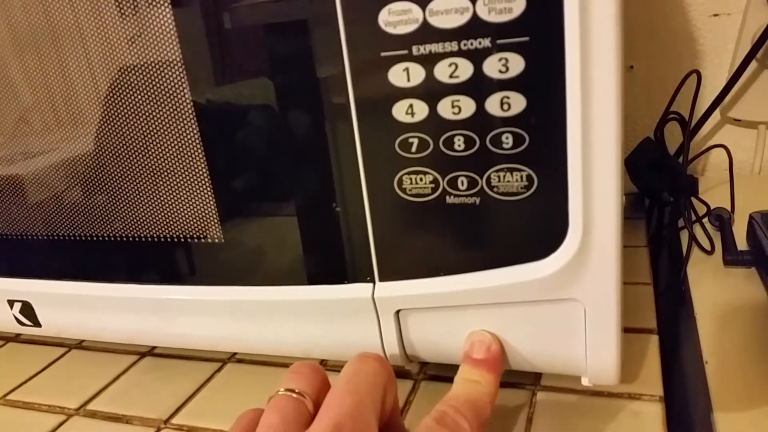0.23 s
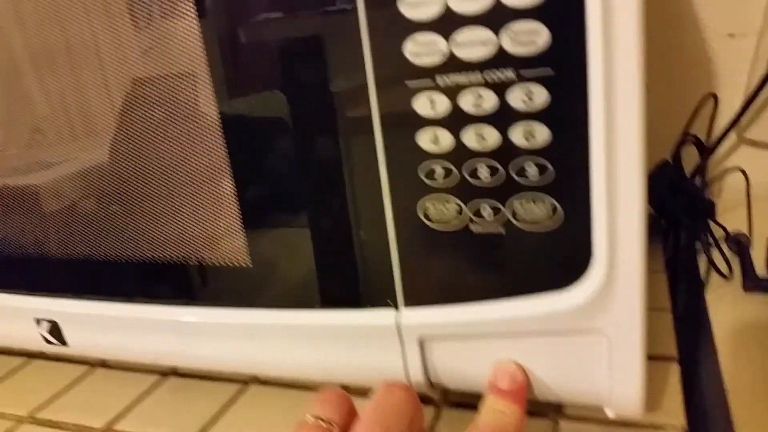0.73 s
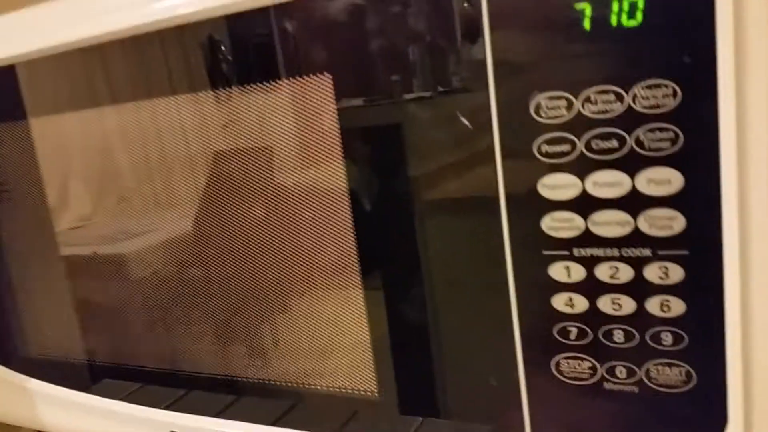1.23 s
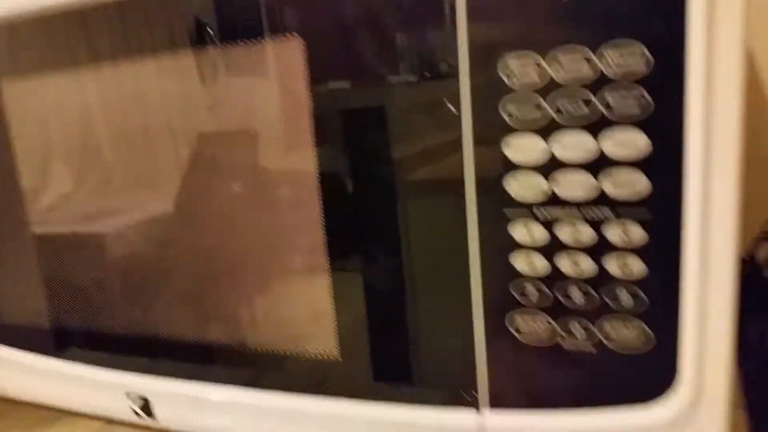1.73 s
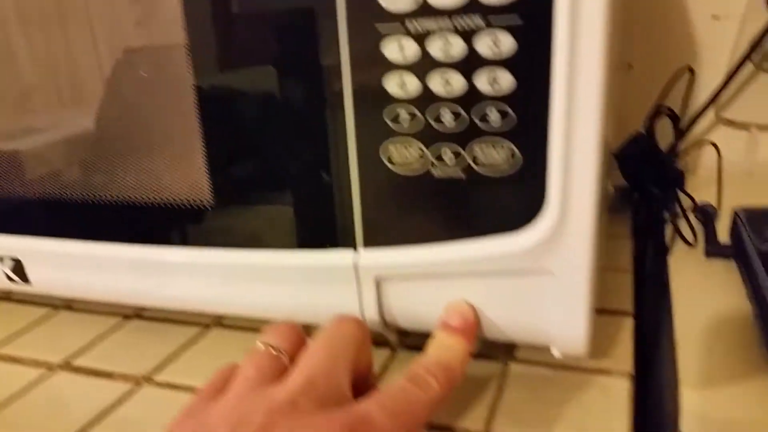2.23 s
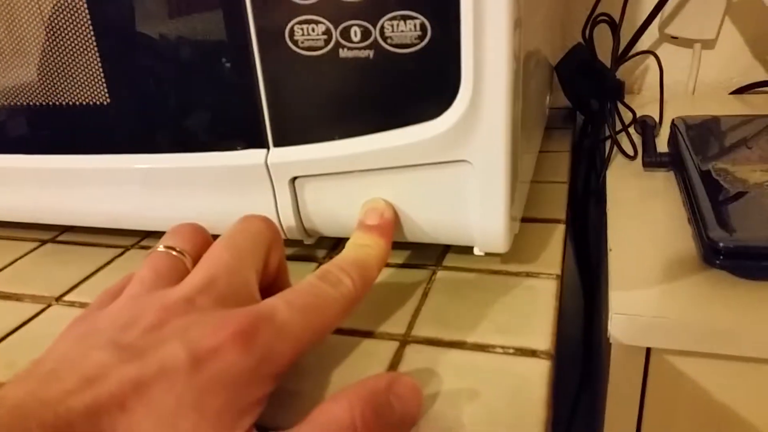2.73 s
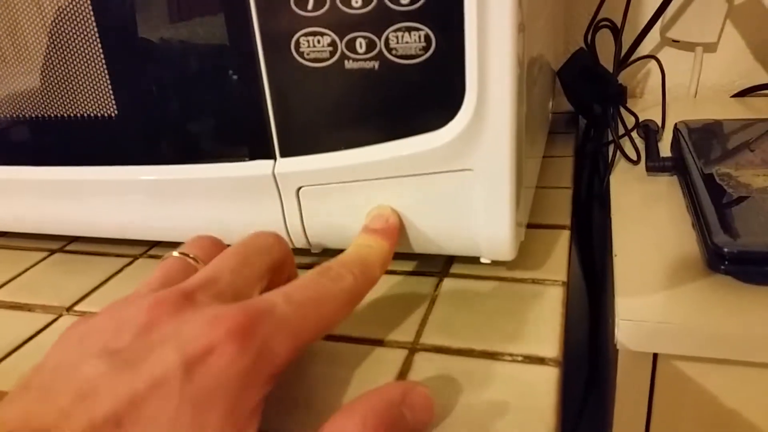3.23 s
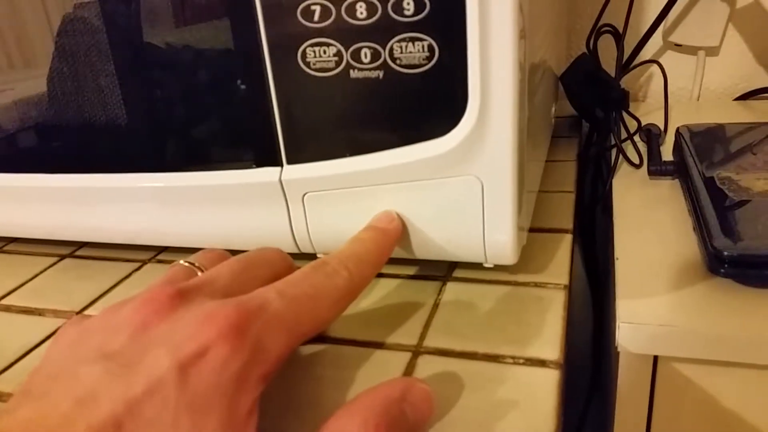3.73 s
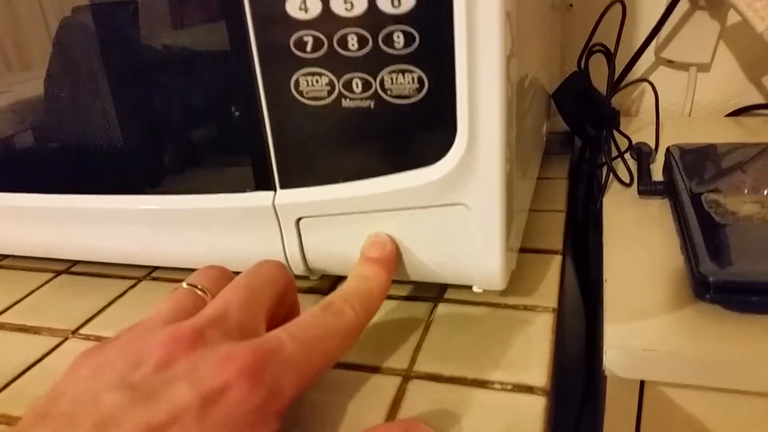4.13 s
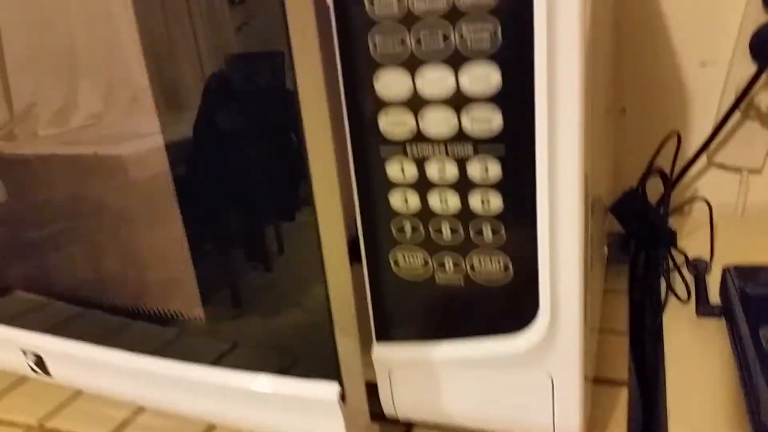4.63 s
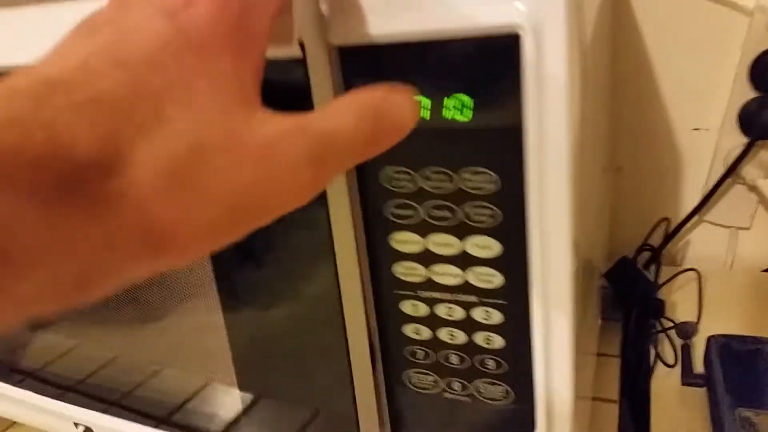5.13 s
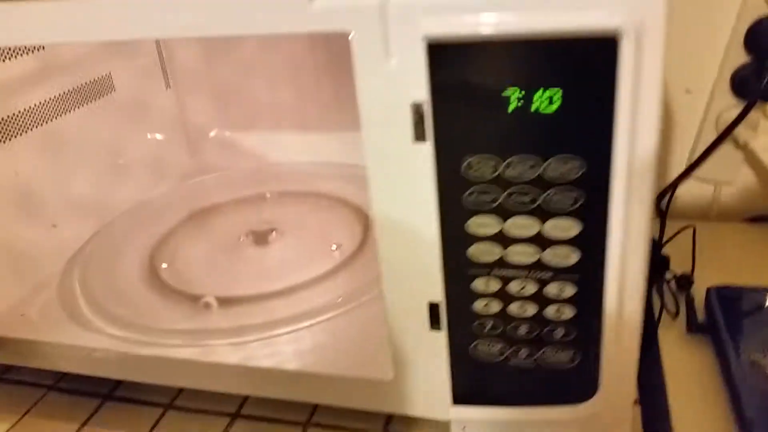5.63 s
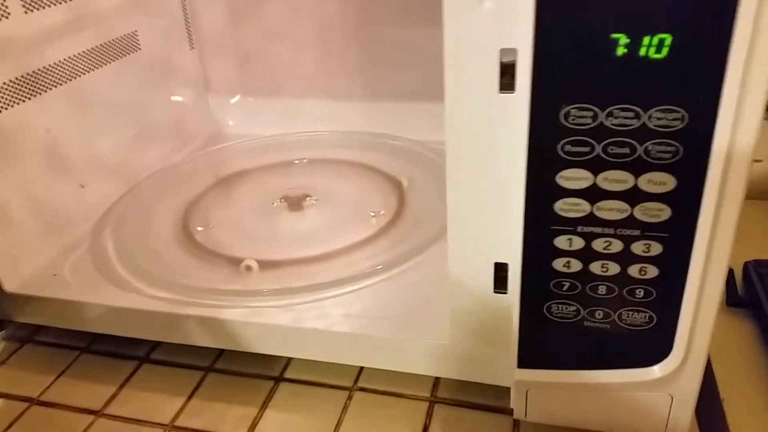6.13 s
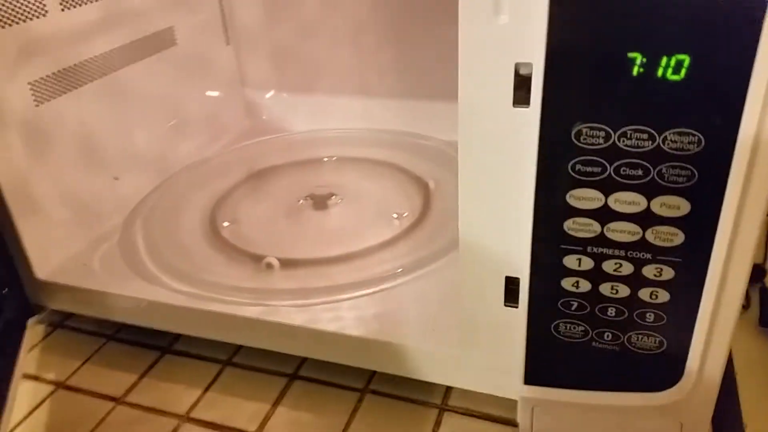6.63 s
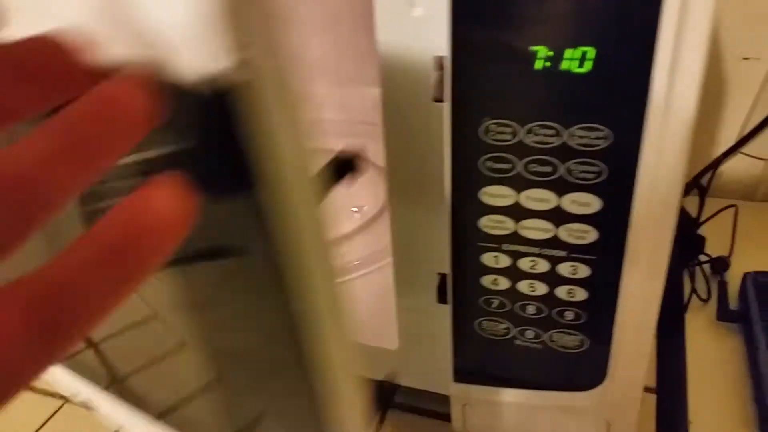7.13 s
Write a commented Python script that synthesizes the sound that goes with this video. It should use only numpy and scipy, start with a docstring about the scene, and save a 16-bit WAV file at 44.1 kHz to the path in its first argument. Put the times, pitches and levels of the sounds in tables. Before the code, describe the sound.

Close in a hard kitchen, a microwave whirs and hums, clicks off and coasts down; its door clunks open loudly, then knocks softly.

```python
"""A microwave oven on a tiled kitchen counter: filtered noise gives air and faint hiss, sines give hum and fan.
First the fan spins up with a soft bump of the hand, then runs steadily until the switch cuts the power.
As it coasts down the button is pushed home, the door judders and the latch lets go with a loud clatter.
Last the door knocks and ticks as it is swung by hand. Bursts of noise and ringing modes make the contacts;
a small hard room answers them."""
import sys
import numpy as np
from scipy import signal
from scipy.fft import rfft, irfft, next_fast_len
from scipy.io import wavfile
from scipy.ndimage import uniform_filter1d, map_coordinates

SR = 44100
rng = np.random.default_rng(int(sys.argv[2]) if len(sys.argv) > 2 else 0)


def output_pcm(signal):
    """Save a mono or channel-first signal as 16-bit PCM at the path in sys.argv[1].

    Samples are clipped to [-1, 1] before scaling.
    """
    pcm = np.clip(np.atleast_2d(signal).T, -1, 1) * 32767
    wavfile.write(sys.argv[1], SR, np.round(pcm).astype(np.int16))


N = 325017  # length in samples

# Background levels: (time [s], room rumble [dB], microphone hiss [dB])
BACKGROUND_LEVELS = [(0, -48.5, -62), (4.3, -54.5, -61.5), (4.85, -54.5, -66.5), (5.4, -52, -64),
                     (6.6, -57, -69), (7.4, -57, -66)]
# Colour of the room rumble: (frequency [Hz], relative level [dB])
RUMBLE_COLOUR = [(20, -6), (60, 0.5), (100, 3.5), (130, 1), (300, -2), (480, -9), (700, -14), (1100, -23.5),
                 (2200, -25), (3000, -43), (8000, -69.5)]
# Colour of the microphone hiss: (frequency [Hz], relative level [dB])
HISS_COLOUR = [(1000, -27.5), (2400, -5.5), (3100, -14.5), (3500, 2.5), (3900, 3), (4300, -7), (5000, -16),
               (6100, -33.5), (7400, -10), (9200, -35), (11000, -28.5), (12500, -9), (14500, -16.5)]
# Stereo width of broad sounds: (frequency [Hz], side against mid [dB])
WIDTH = [(30, -16), (80, -12.5), (160, -12.5), (300, -9), (600, -6.5), (1200, -0.5), (2500, 0.5),
         (5000, 0.5), (14000, -0.5)]
# Stereo width of the door, close by: (frequency [Hz], side against mid [dB])
CLOSE_WIDTH = [(30, -9), (80, -16.5), (160, -13.5), (300, -16), (600, -8.5), (1200, -1), (2300, -1),
               (4500, 1.5), (14000, -0.5)]
# Decay of the small hard room: (frequency [Hz], t60 [s])
KITCHEN_DECAY = [(100, 0.88), (300, 0.97), (700, 0.47), (2000, 0.4), (5000, 0.38), (14000, 0.58)]
# How strongly the room answers: (frequency [Hz], level [dB])
ROOM_SEND = [(200, -3.5), (2000, -6), (7000, -7), (13000, -15.5)]
# Balance of the two microphone ports: (frequency [Hz], left against right [dB])
PORT_BALANCE = [(200, -1), (400, -0.5), (700, 4), (1300, -2), (2300, 3.5), (3100, 1), (3900, 15),
                (5200, -6), (6300, -1.5), (7500, 5), (9200, 12), (11500, 1), (13000, 0)]
TOP_HZ = 14700  # band limit

# Partials of the mains hum: (multiple of the hum pitch, level [dB])
HUM_PARTIALS = [(1, 1), (2, -21.5), (3, -19.5), (4, -38.5), (5, -31)]
HUM_HZ = 99.9
OFF_S = 3.365  # the door switch cuts the power
HUM_DB, IDLE_DB, HUM_T60_S = -44.5, -67.5, 0.51  # under power, lasting trace, dying away

# Rough overtones of the fan: (multiple of the blade rate, level against the octave [dB])
FAN_OVERTONES = [(3, -19), (4, -23.5), (5, -20.5), (5.45, -22.5), (8, -26), (10, -28)]
# Dull rush of air through the vents: (frequency [Hz], relative level [dB])
RUSH_COLOUR = [(30, -24.5), (70, -18.5), (150, 7.5), (200, 2.5), (250, -6), (300, 4.5), (390, -2.5),
               (480, -1.5), (590, -7.5), (700, -2.5), (860, -4), (1000, -13.5), (1500, -34), (4000, -86.5)]
# Bright rush of air through the vents: (frequency [Hz], relative level [dB])
BRIGHT_COLOUR = [(400, -46.5), (850, -19), (1050, 2), (1250, 0.5), (1450, 1), (1700, 0), (1850, -4.5),
                 (2300, -6), (2900, -13.5), (4500, -28.5), (9000, -72)]
# Panels that boom as a blade tone glides past: (frequency [Hz], half-width [Hz], lift [dB])
PANELS = [(147.5, 6.8, 12), (155.7, 2.7, 10.5), (165.6, 1.2, 5), (294.4, 23, 10.5)]
FULL_HZ = 168.1  # blade-pass rate at full speed
START_HZ, CLIMB_HZ_PER_S, KNEE = 20, 118, 10  # first rate, steady climb, sharpness of levelling off
COAST_S, COAST_POWER = 0.49, 0.76  # air drag slows the fan, fast at first
BLADE_DB, BLADE_POWER = -40, 3.6  # blade tone at full speed before panel lift, power of speed it follows
OCTAVE_DB, OCTAVE_POWER = -38, 15  # the same for its octave

# Modes of the steel case and its cavity: (frequency [Hz], relative level [dB], t60 [s])
CASE_MODES = [(98, -15, .6), (139, -16, .45), (157, -12, .75), (169, -13.5, .45), (184, -16, .45),
              (207, -21, .4), (254, -26, .95), (286, -22, .6), (506, -17, .36), (542, -14.5, .28),
              (579.5, -17, .28), (633, -18, .3), (698, -22, .2), (786, -24, .3), (830, -17, .28),
              (914.5, -17.5, .28), (956, -18.5, .33), (1016, -18.5, .3), (1055, -18.5, .28),
              (1122, -17.5, .36), (1221, -18, .24), (1297, -21, .22), (1380, -18, .24), (1444, -17.5, .24),
              (1571, -17.5, .22), (1643, -20, .25), (1911, -27, .22), (2045, -17.5, .22), (2132, -18, .22),
              (2296, -19, .26), (2600, -26.5, .25), (3580, -33, .28), (4260, -26, .14)]
CAVITY_FROM_HZ, CAVITY_WIDTH_HZ = 450, 9  # above this the air inside shares case modes; half-width
# Dense, short-lived modes of the plastic front: (frequency [Hz], relative level per Hz [dB])
PLASTIC_COLOUR = [(25, -39.5), (70, -33.5), (150, -24.5), (210, -27), (370, -34), (550, -32), (900, -33.5),
                  (1400, -30.5), (2200, -32.5), (3000, -40), (4100, -40), (5500, -49), (8000, -39),
                  (10000, -47.5), (14000, -40)]
RATTLE_PER_S, RATTLE_DB, TAP_T60_S = 420, 3, .007  # loose plastic: tap rate, unevenness, tap decay
BRIGHT_FROM_HZ = 640  # brightness tilts a contact's drive upward from here

# Brief rubs and hisses, and one short click:
# (time [s], half-length [s], level [dB], centre [Hz], width [octaves])
SCUFFS = [(0.105, 0.18, -61.5, 1450, 0.42), (0.244, 0.019, -55, 1760, 0.22),
          (2.224, 0.045, -57.5, 14000, 0.1), (4.659, 0.033, -56, 13600, 0.092),
          (5.014, 0.00084, -44.5, 3360, 0.23), (5.152, 0.0064, -55.5, 1700, 0.34),
          (5.192, 0.015, -54.5, 1340, 0.33), (6.29, 0.0098, -67, 1697, 0.38),
          (5.562, 0.038, -53.5, 2550, 0.39), (6.017, 0.042, -52.5, 477, 0.47),
          (6.918, 0.04, -65, 730, 0.49)]
# Parts set swinging, from oven on its feet to door panel:
# (time [s], frequency [Hz], level [dB], build-up [s], t60 [s])
THUDS = [(.352, 102.5, -19.5, 0.036, 0.25), (0.359, 202, -34.5, .015, 0.26), (.35, 493, -35, .02, .1),
         (3.948, 162.5, -36, .006, .35), (4.394, 71, -12, 0.013, 0.12), (4.44, 101, -13.5, .01, 0.21),
         (4.452, 47, -33, .02, 0.63), (4.481, 32.8, -34, .03, 0.83), (4.534, 99.7, -20, 0.0076, 0.25),
         (5.131, 89, -31.5, 0.014, 0.25), (5.439, 280, -40, 0.0073, 0.071), (5.533, 294, -32, 0.0034, 0.08),
         (5.982, 163, -43, 0.0063, .29), (6.55, 257, -30.5, 0.0067, 0.084)]

# Drive of a soft bump: (frequency [Hz], level [dB])
BUMP_DRIVE = [(140, 2.5), (520, -8), (2000, -29), (7500, -54.5)]
# Bumps of the hand on the case: (time [s], level [dB], brightness [dB per octave])
BUMPS = [(.327, -42.5, -5), (.357, -33, -10.5), (3.27, -30, -6), (5.1, -38, -4), (5.135, -38, -1),
         (5.98, -39.5, -1), (6.05, -42, 6), (6.552, -46, -11), (6.805, -44, 0)]
BUMP_CONTACT_S, BUMP_REBOUND_S, BUMP_REBOUND_DB = 0.048, .022, -7
# Drive of a heavy jolt: (frequency [Hz], level [dB])
JOLT_DRIVE = [(100, -4), (175, 2.5), (280, -1.5), (450, -5), (850, 1), (2000, -13), (7500, -16.5),
              (13000, -18)]
# Door jolts as the button forces its hooks up and it springs free:
# (time [s], level [dB], brightness [dB per octave])
JOLTS = [(4.284, -30, 0), (4.331, -23.5, 1.5), (4.347, -20, 1), (4.378, -18, -1.5), (4.389, -23, 2),
         (4.402, -21.5, 1.5), (4.416, -24.5, 1), (4.439, -17.5, 0), (4.529, -25, -2), (4.565, -33.5, -5)]
JOLT_CONTACT_S, JOLT_REBOUND_S, JOLT_REBOUND_DB = 0.023, .007, -1
# Drive of a hollow knock: (frequency [Hz], level [dB])
KNOCK_DRIVE = [(140, -6), (330, -3), (540, 3.5), (1100, -2), (2000, -5), (7500, -22.5), (13000, -26.5)]
# Knocks of plastic button and door: (time [s], level [dB], brightness [dB per octave], contact [s])
KNOCKS = [(3.96, -37, -2, 0.02), (3.967, -39, -8, 0.013), (3.994, -32.5, -8, .016),
          (4.014, -46.5, -3.5, .016), (4.112, -36, -4.5, 0.013), (4.12, -41, -5.5, 0.0132),
          (4.208, -51, -4, 0.026), (4.244, -42.5, -4, .018), (4.265, -37, -2, .052),
          (4.3135, -16.5, -3, 0.0087), (4.459, -22.5, -1, 0.014), (5.0, -50, 1, .043),
          (5.404, -45.5, 0.5, .08), (5.438, -39.5, -1.5, .014), (5.446, -42.5, -2.5, 0.017),
          (5.454, -49.5, 3, 0.015), (5.531, -40, 2.5, .06), (5.625, -41.5, -0.5, 0.012),
          (5.958, -37.5, -6, 0.077), (6.549, -49.5, -14, 0.024), (6.568, -57, -9, 0.029)]
# Drive of a hard clack: (frequency [Hz], level [dB])
CLACK_DRIVE = [(140, -12), (520, -9), (1000, -1), (1500, -0.5), (2300, -0.5), (4000, -5), (7500, -14),
               (13000, -10)]
# Clacks of switch lever and latch hooks:
# (time [s], level [dB], brightness [dB per octave], contact [s])
CLACKS = [(3.323, -25.5, -3.5, .026), (3.331, -32.5, -3, 0.021), (3.338, -21, -6.5, 0.024),
          (3.346, -29.5, -7.5, .022), (3.356, -26.5, -3.5, 0.02), (3.365, -26, -5.5, 0.025),
          (4.3135, -28.5, 4, .016), (4.322, -30, -3.5, 0.012), (4.443, -24.5, -7.5, .018),
          (4.457, -11.5, -4, .011), (4.487, -15.5, 1, 0.031), (4.4955, -13, -1.5, .019),
          (4.513, -24, -1.5, .02)]
# Drive of a bright tick: (frequency [Hz], level [dB])
TICK_DRIVE = [(140, -5.5), (520, 4), (2000, -5.5), (6000, -11.5), (10500, -10.5), (13000, 2)]
# Ticks of the button and its spring: (time [s], level [dB], brightness [dB per octave], contact [s])
TICKS = [(3.27, -44, 0.5, .03), (3.291, -36, 0, .026), (3.325, -40, -1, .02), (3.337, -38, -1, .025),
         (3.355, -26.5, -0.1, .02), (3.365, -28.5, -1.1, .015), (4.208, -50.5, 0, .02),
         (4.272, -45, 1, .05), (4.286, -31, 0.5, .033), (4.302, -32.5, 2.5, .05), (4.3135, -33.5, 1, .012),
         (4.457, -27, 0, .007), (4.4875, -34.5, 3.5, .016)]
# Drive of the hinge: (frequency [Hz], level [dB])
HINGE_DRIVE = [(140, -7.5), (520, 1.5), (1500, -7), (2200, -3), (6000, -3.5), (7800, -0.5), (10500, -3),
               (12200, 1.5), (14500, -3.5)]
# Dry ticks as the door swings: (time [s], level [dB], brightness [dB per octave], contact [s])
HINGE_TICKS = [(4.963, -57, -1.5, 0.0067), (5.625, -49.5, -0.5, 0.023), (5.957, -50, -2, 0.033),
               (5.999, -50.5, 0, 0.044), (6.832, -46, 0, 0.078)]
# Button and latch lean left near 11 kHz and right above 12 kHz: (frequency [Hz], left against right [dB])
LATCH_BALANCE = [(9000, -0.5), (11000, 4.5), (12500, -7.5)]
# Latch hooks and their spring: (frequency [Hz], level [dB], t60 [s])
HOOK_MODES = [(2045, -1, .17), (2128, -2.5, .15), (2290, -3, .15), (2345, -6, .11), (2482, -10, .14),
              (2960, -10, .13), (3120, -12, .1), (4080, -9, .08), (4135, -9, .08), (5080, -18, .1)]
# Hooks snapping free: (time [s], level [dB])
HOOK_HITS = [(4.3135, -37), (4.458, -43), (4.4885, -27.5)]
# Steel stop at the end of the door's swing: (frequency [Hz], level [dB], t60 [s])
STOP_MODES = [(1296, -11.5, 0.076), (1580, -14, .027), (1955, -9, 0.055), (2024, -1.5, 0.024),
              (2160, -21, 0.11), (2170, -12, .09), (2390, -21, 0.054)]
# Door meeting the stop: (time [s], level [dB])
STOP_HITS = [(5.6245, -31), (5.632, -45), (5.642, -40.5)]


def amp(db):
    """Decibels to gain."""
    return 10 ** (np.asarray(db) / 20)


def unit(x):
    """x at rms 1."""
    return x / np.sqrt(np.mean(x ** 2) + 1e-20)


def along(points, hz):
    """(frequency, value) points joined on a log axis."""
    f, v = np.transpose(points)
    return np.interp(np.log(hz + 1), np.log(f + 1), v)


def curves(rows):
    """One value per sample for each column after the time."""
    s, *cols = np.transpose(rows)
    return [np.interp(np.arange(N) / SR, s, c) for c in cols]


def wobble(rate):
    """A smooth random curve, rate knots a second."""
    knots = rng.standard_normal(int(N * rate / SR) + 4)
    return map_coordinates(knots, [np.arange(N) * rate / SR])


def filtered(x, response):
    """x times a response of frequency."""
    n = x.shape[-1]
    m = next_fast_len(n + SR // 4)
    return irfft(rfft(x, m) * response(np.fft.rfftfreq(m, 1 / SR)), m)[..., :n]


def causal(level_db, size=4096):
    """The most prompt (minimum-phase) impulse response that has the given dB spectrum."""
    cepstrum = irfft(level_db(np.fft.rfftfreq(size, 1 / SR)) * np.log(10) / 20)
    cepstrum[1:size // 2] *= 2
    cepstrum[size // 2 + 1:] = 0
    return irfft(np.exp(rfft(cepstrum)))


def spread(pair, width=WIDTH):
    """Two unrelated signals become left and right: alike in the bass, apart in the treble."""
    def mid_side_gains(hz):
        turn = np.arctan(amp(along(width, hz)))
        return np.array([np.cos(turn), np.sin(turn)])
    mid, side = filtered(pair, mid_side_gains)
    return np.array([mid + side, mid - side])


def panned(x, balance):
    """x leaning left or right by frequency, at the same power."""
    def response(hz):
        gains = amp(np.outer([.5, -.5], along(balance, hz)))
        return gains / np.sqrt(np.mean(gains ** 2, axis=0))
    return filtered(x, response)


def noise(spectrum):
    """Stereo noise of rms 1 with the given colour."""
    white = spread(rng.standard_normal((2, N)))
    return unit(filtered(white, lambda hz: amp(along(spectrum, hz))))


def tone(pitch_hz, multiple, flutter_db):
    """One partial, of rms 1 before its level flutters."""
    phase = 2 * np.pi * (multiple * np.cumsum(pitch_hz) / SR + rng.random())
    return np.sqrt(2) * np.sin(phase) * amp(flutter_db * wobble(17))


def rough_tone(pitch_hz, multiple, rough_hz):
    """A partial of rms 1 whose strength and phase are stirred by turbulence."""
    stir = 1.1 + wobble(rough_hz) + 1j * wobble(rough_hz)
    turning = np.exp(2j * np.pi * multiple * np.cumsum(pitch_hz) / SR)
    return unit(np.real(stir * turning))


def background():
    """Room rumble and microphone hiss: coloured noise at slowly drawn levels."""
    rumble_db, hiss_db = curves(BACKGROUND_LEVELS)
    rumble = amp(rumble_db + 2.4 * wobble(8.7)) * noise(RUMBLE_COLOUR)
    return rumble + amp(hiss_db) * noise(HISS_COLOUR)


def kitchen(x):
    """Tiles and walls answer with decaying noise; each frequency dies at its own speed."""
    hz, t, z = signal.stft(rng.standard_normal((2, SR * 3 // 4)), SR, nperseg=256)
    fading = z * amp(-60 * t / along(KITCHEN_DECAY, hz)[:, None])
    tail = spread(signal.istft(fading, SR, nperseg=256)[1])
    delay = round(.006 * SR)  # 6 ms before the first answer
    tail = np.pad(tail / np.linalg.norm(tail[0]), ((0, 0), (delay, 0)))
    return signal.fftconvolve(x, tail, axes=1)[:, :N]


def since_off():
    """Seconds since the power was cut; zero before that."""
    return np.maximum(np.arange(N) / SR - OFF_S, 0)


def hum():
    """Windings shake the case at twice the mains frequency; a trace stays once the power is cut."""
    level = amp(HUM_DB - 60 * since_off() / HUM_T60_S) + amp(IDLE_DB)
    pitch = HUM_HZ * (1 + .004 * wobble(7.5))
    return level * sum(amp(db) * tone(pitch, k, flutter_db=0.9) for k, db in HUM_PARTIALS)


def fan_speed():
    """Share of full speed: a steady climb that levels off, then a coast against the air."""
    climb = (START_HZ + CLIMB_HZ_PER_S * np.arange(N) / SR) / FULL_HZ
    driven = climb / (1 + climb ** KNEE) ** (1 / KNEE)
    return driven / (1 + since_off() / COAST_S) ** COAST_POWER


def panel_lift(tone_hz):
    """Gain of a blade tone as it glides through the panel resonances."""
    return amp(sum(db * np.exp(-((tone_hz - hz) / width) ** 2) for hz, width, db in PANELS))


def cavity(x, lift_db):
    """Air noise leaving the cavity is lifted at the case's resonances and dips between them."""
    def level_db(hz):
        peaks = sum(np.exp(-((hz - mode_hz) / CAVITY_WIDTH_HZ) ** 2)
                    for mode_hz, _, _ in CASE_MODES if mode_hz > CAVITY_FROM_HZ)
        return lift_db * (peaks - uniform_filter1d(peaks, size=75))
    return signal.fftconvolve(x, causal(level_db, size=16384)[None], axes=1)[:, :N]


def fan():
    """Blade tones and air rush grow as powers of the speed; panels boom as a tone glides past."""
    speed = fan_speed()
    pitch = FULL_HZ * speed * (1 + .002 * wobble(10))
    blade = panel_lift(FULL_HZ * speed) * tone(pitch, 1, flutter_db=2.15)
    octave = panel_lift(2.02 * FULL_HZ * speed) * tone(pitch, 2, flutter_db=1.0)
    overtones = sum(amp(db) * rough_tone(pitch, k, rough_hz=22.1) for k, db in FAN_OVERTONES)
    tones = amp(BLADE_DB) * speed ** BLADE_POWER * blade
    tones = tones + amp(OCTAVE_DB) * speed ** OCTAVE_POWER * (octave + overtones)
    throb = 1 + .1 * tone(pitch, 0.91, flutter_db=-4)  # the bright air pulses just below the blade rate
    rush = amp(-41 + 0.48 * wobble(7.9)) * speed ** 2.85 * noise(RUSH_COLOUR)
    bright = amp(-49.5 + 0.39 * wobble(0.77)) * speed ** 3.44 * throb * noise(BRIGHT_COLOUR)
    return tones + cavity(rush + bright, lift_db=5)


def scuffs():
    """Brief rubs and hisses, and one short click: each a swell of noise around one pitch."""
    out, t = np.zeros((2, N + SR)), np.arange(-SR // 3, SR // 3) / SR
    for s, half_s, db, centre_hz, octaves in SCUFFS:
        band = lambda hz: np.exp(-.25 * (np.log2((hz + 1) / centre_hz) / octaves) ** 2)
        grain = unit(filtered(spread(rng.standard_normal((2, len(t)))), band))
        swell = np.exp(-.5 * (t / half_s) ** 2)
        out[:, round(s * SR):][:, :len(t)] += amp(db) * swell * grain
    return out[:, len(t) // 2:][:, :N]  # each swell peaks at its listed time


def thuds():
    """Each part swings as a low sine that builds up and dies away."""
    out, t = np.zeros(N + SR), np.arange(SR) / SR
    for s, hz, db, build_s, t60 in THUDS:
        envelope = amp(db - 60 * t / t60) * (1 - np.exp(-t / build_s))
        out[round(s * SR):][:SR] += envelope * np.sin(2 * np.pi * hz * t)
    return out[:N]


def ringing(modes, hits):
    """A small hard part rings with the same modes at every hit, in slightly varied balance."""
    out, t = np.zeros(N + SR), np.arange(SR // 2) / SR
    hz, db, t60 = np.transpose(modes)
    rings = np.sin(2 * np.pi * hz[:, None] * t) * amp(-60 * t / t60[:, None])
    for s, strength_db in hits:
        out[round(s * SR):][:len(t)] += amp(strength_db + db + rng.normal(0, 0.76, len(hz))) @ rings
    return out[:N]


def case_ring(drive_db, ring_db, t):
    """The steel case rings in decaying sines; its loose panels sit a little differently each time."""
    hz, db, t60 = np.transpose(CASE_MODES)
    sizes = amp(db + ring_db + drive_db(hz) + rng.normal(0, 3.2, len(hz)))
    sizes = sizes * rng.choice([-1, 1], len(hz))
    hz = hz * (1 + rng.normal(0, .002, len(hz)))
    turns = np.outer(hz, t).astype(np.float32)
    fall = np.outer(np.log(1000) / t60, t).astype(np.float32)
    return sizes @ (np.sin(2 * np.pi * turns) * np.exp(-fall))


def rattling(share, t):
    """Gain of loose plastic: the given share of its power comes in uneven little taps."""
    taps = (rng.random(len(t)) < RATTLE_PER_S / SR) * amp(RATTLE_DB * rng.standard_normal(len(t)))
    chatter = unit(signal.lfilter([1], [1, -amp(-60 / (TAP_T60_S * SR))], taps))
    return np.sqrt(1 - share + share * chatter ** 2)


def blow(drive_db, contact_s, body_t60, body_db, rattle, ring_db):
    """One contact: a spike, a crack and a short shudder of the plastic, and the ring of the steel case."""
    t = np.arange(SR * 3 // 4) / SR
    rise = 1 - np.exp(-t / (0.91 * contact_s ** 2))  # long contacts swell, short ones strike
    spike = amp(-0.5 - 60 * t / 0.00075)
    crack = np.sqrt(0.01 / contact_s) * (amp(-60 * t / contact_s) + spike)
    shudder = rattling(rattle, t) * amp(body_db - 60 * t / body_t60)
    grain = spread(rng.standard_normal((2, len(t))), CLOSE_WIDTH) * np.sqrt(SR / 2)
    burst = grain * rise * (crack + shudder)
    colour = causal(lambda hz: along(PLASTIC_COLOUR, hz) + drive_db(hz))
    plastic = signal.fftconvolve(burst, colour[None], axes=1)[:, :len(t)]
    return amp(6.0) * plastic + rise * case_ring(drive_db, ring_db, t)


def rebounding(rows, contact_s, rebound_s, rebound_db):
    """Each contact is followed by one weaker rebound."""
    return [(s + k * rebound_s, db + k * rebound_db, brightness, contact_s)
            for s, db, brightness in rows for k in (0, 1)]


def strike(contacts, drive, body_t60, body_db, rattle, ring_db):
    """All contacts of one kind; brightness tilts the treble of their shared drive."""
    out = np.zeros((2, N + SR))
    for s, db, brightness, contact_s in contacts:
        def drive_db(hz):
            tilt = brightness * np.log2(np.maximum(hz / BRIGHT_FROM_HZ, 1))
            return db + along(drive, hz) + tilt
        hit = blow(drive_db, contact_s, body_t60, body_db, rattle, ring_db)
        out[:, round(s * SR):][:, :hit.shape[1]] += hit
    return out[:, :N]


def door():
    """Hand, button, switch, hooks and door strike one case, each kind with its own drive and shudder."""
    bump_pairs = rebounding(BUMPS, BUMP_CONTACT_S, BUMP_REBOUND_S, BUMP_REBOUND_DB)
    jolt_pairs = rebounding(JOLTS, JOLT_CONTACT_S, JOLT_REBOUND_S, JOLT_REBOUND_DB)
    bumps = strike(bump_pairs, BUMP_DRIVE, body_t60=.16, body_db=-9.5, rattle=0.72, ring_db=-3.5)
    jolts = strike(jolt_pairs, JOLT_DRIVE, body_t60=0.11, body_db=-13.5, rattle=0.84, ring_db=-4.5)
    clacks = strike(CLACKS, CLACK_DRIVE, body_t60=0.14, body_db=-13, rattle=.9, ring_db=-7)
    ticks = strike(TICKS, TICK_DRIVE, body_t60=0.15, body_db=-18, rattle=0.5, ring_db=-3)
    knocks = strike(KNOCKS, KNOCK_DRIVE, body_t60=0.18, body_db=-18, rattle=0.42, ring_db=-3.5)
    hinge = strike(HINGE_TICKS, HINGE_DRIVE, body_t60=0.28, body_db=-7.5, rattle=.15, ring_db=-6)
    return panned(jolts + clacks + ticks, LATCH_BALANCE) + bumps + knocks + hinge


def scene():
    """The background, the running oven, and its door handled in the room."""
    handling = door() + ringing(HOOK_MODES, HOOK_HITS) + ringing(STOP_MODES, STOP_HITS) + scuffs()
    room = kitchen(filtered(handling, lambda hz: amp(along(ROOM_SEND, hz))))
    return background() + hum() + fan() + thuds() + handling + room


def record(dry):
    """The two ports differ by frequency; the loudest peaks are rounded off; the top band is cut."""
    x = panned(dry, PORT_BALANCE)
    x = x / (1 + (x / .55) ** 4) ** .25  # soft ceiling at 0.55
    return filtered(x, lambda hz: hz < TOP_HZ)


dry = scene()
out = record(dry)
output_pcm(out)
```